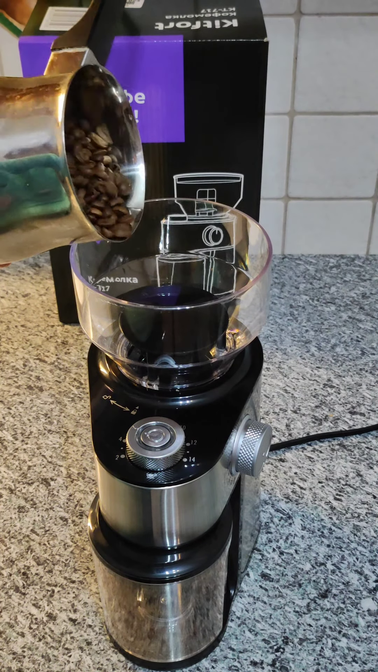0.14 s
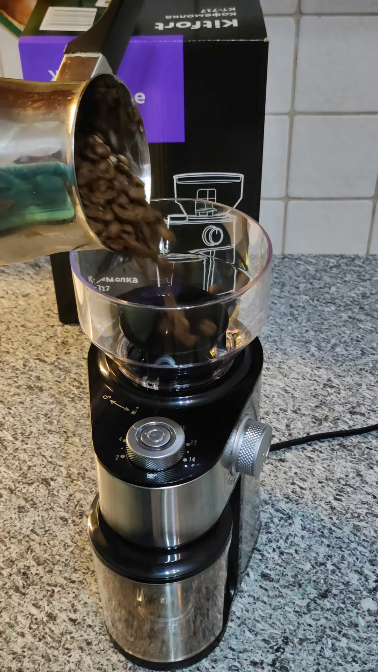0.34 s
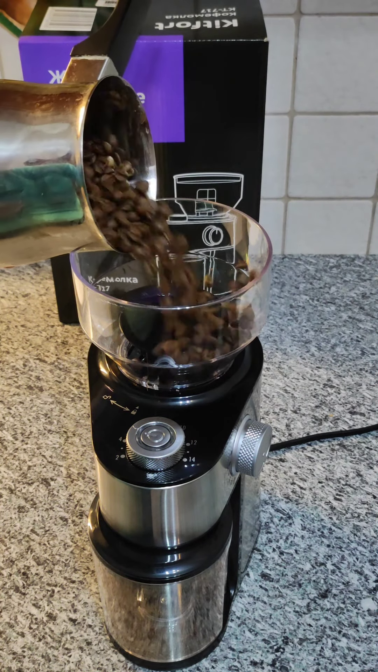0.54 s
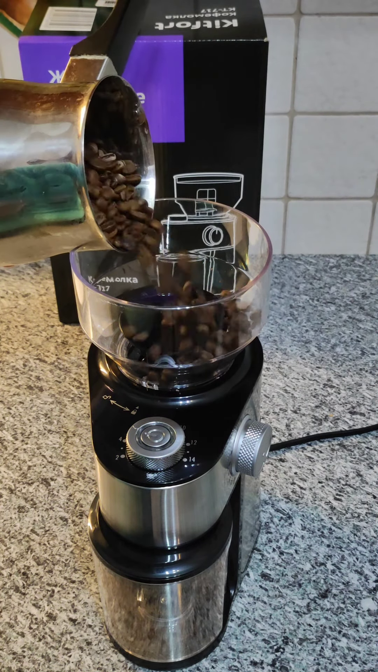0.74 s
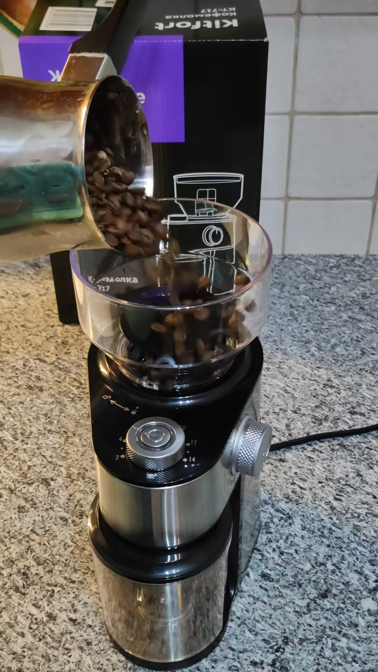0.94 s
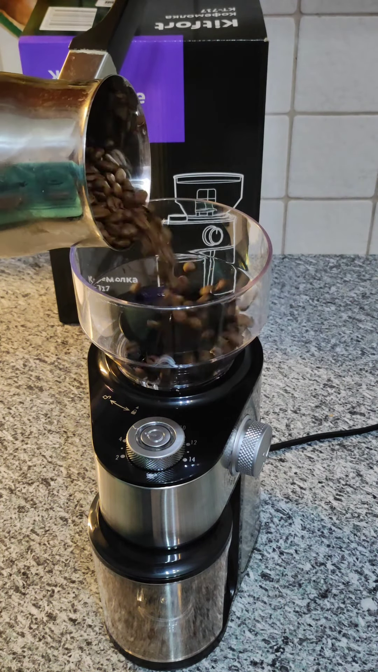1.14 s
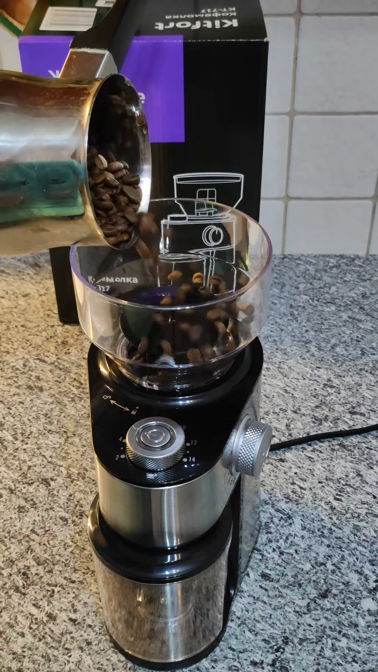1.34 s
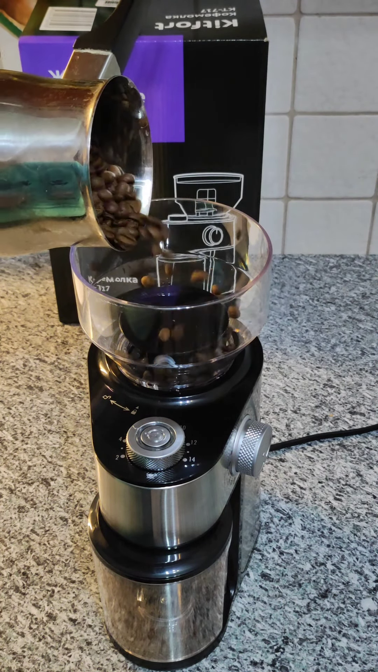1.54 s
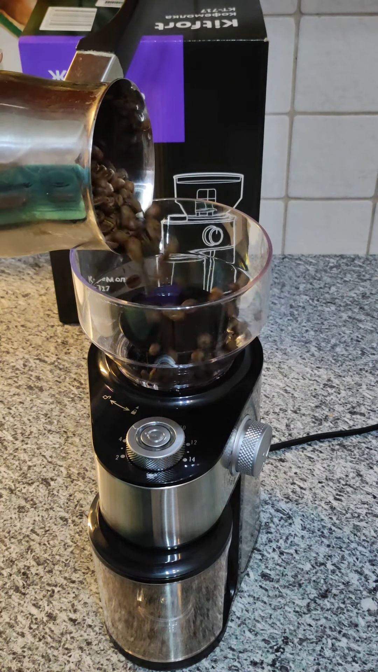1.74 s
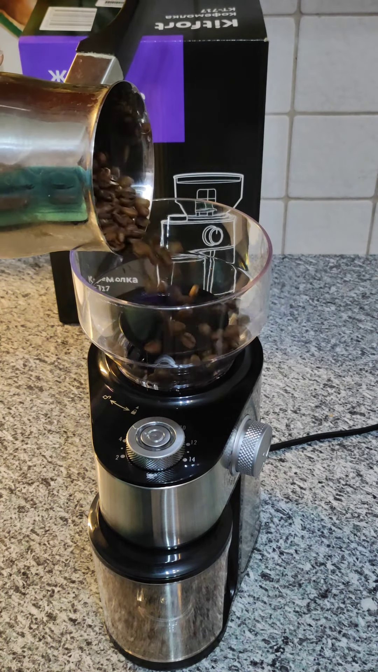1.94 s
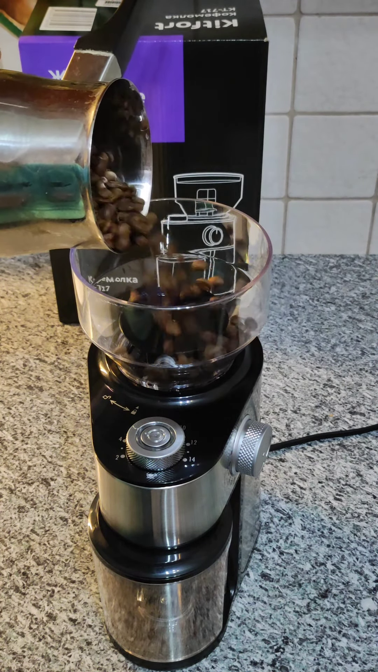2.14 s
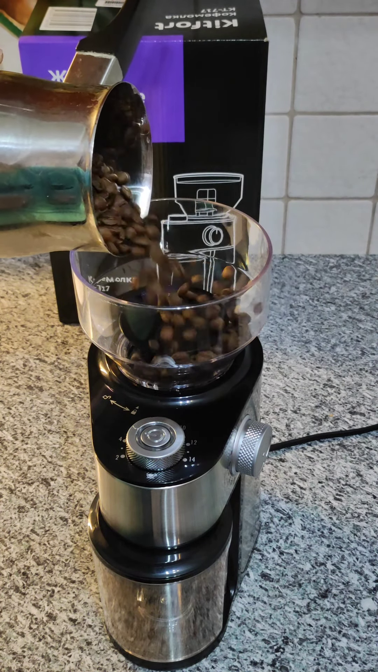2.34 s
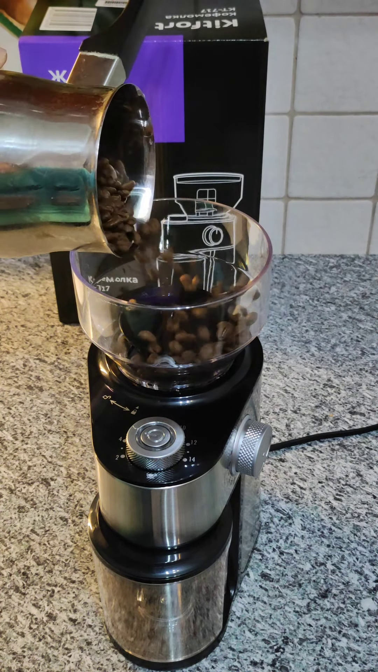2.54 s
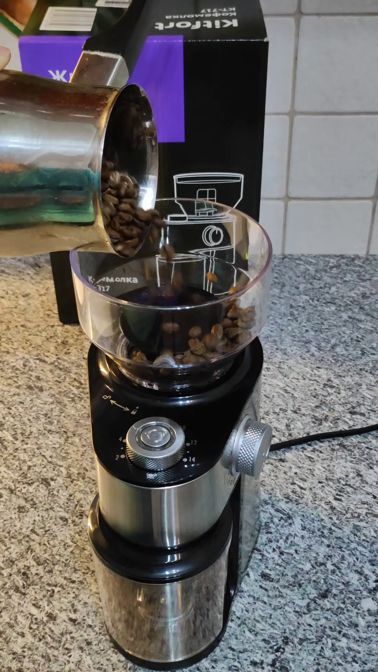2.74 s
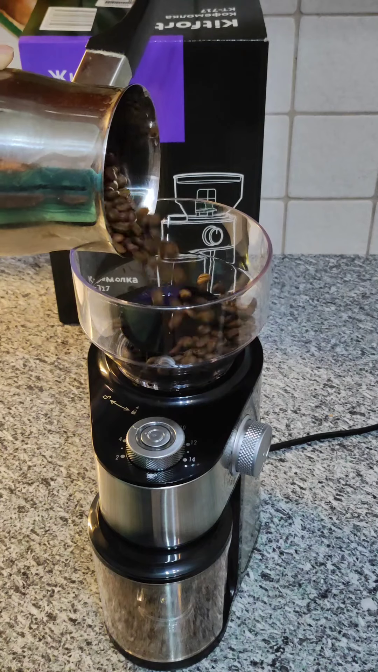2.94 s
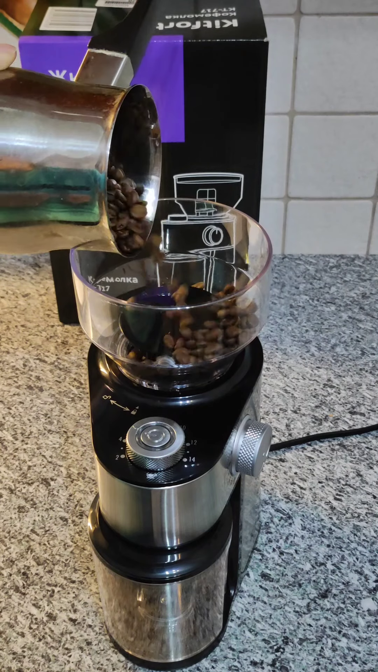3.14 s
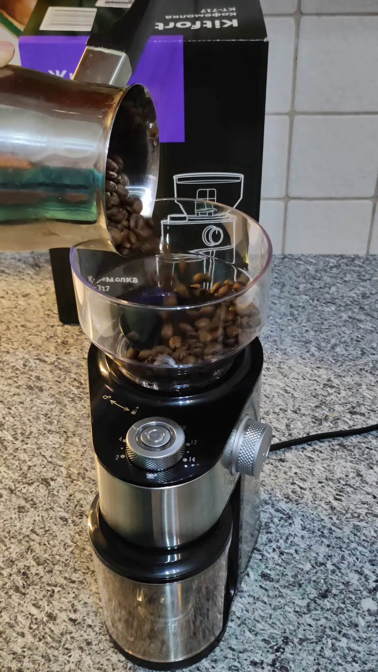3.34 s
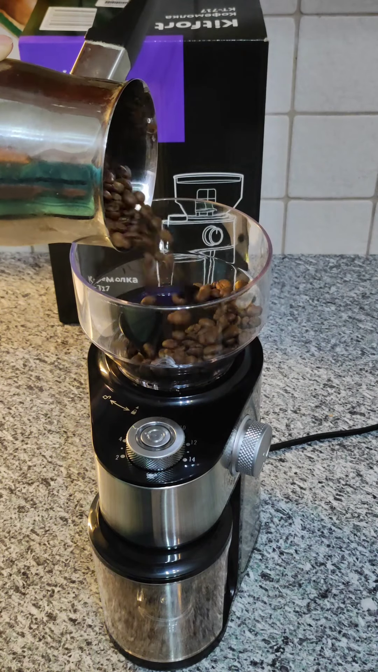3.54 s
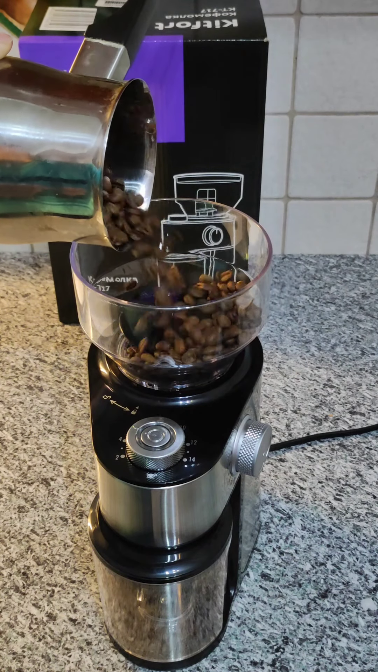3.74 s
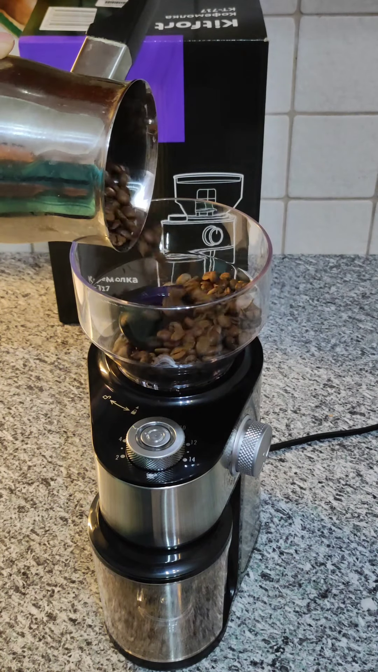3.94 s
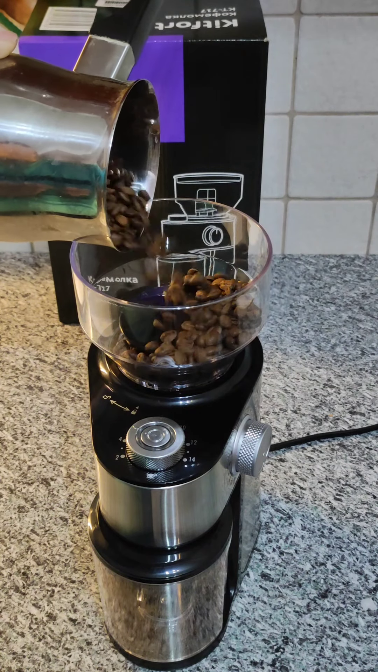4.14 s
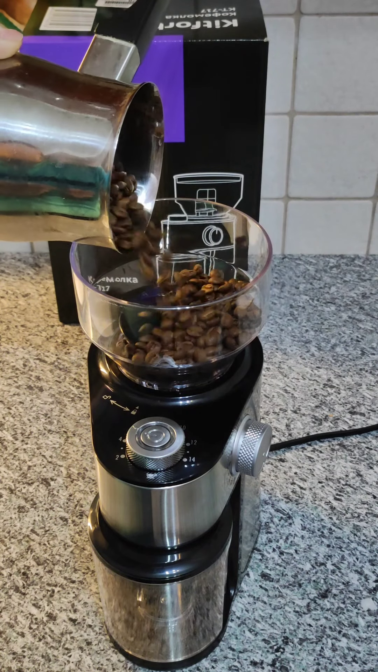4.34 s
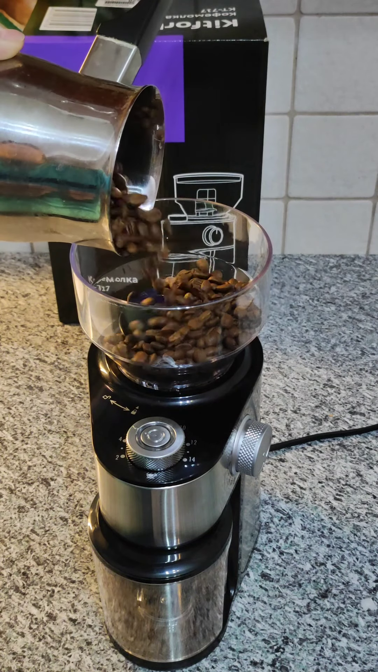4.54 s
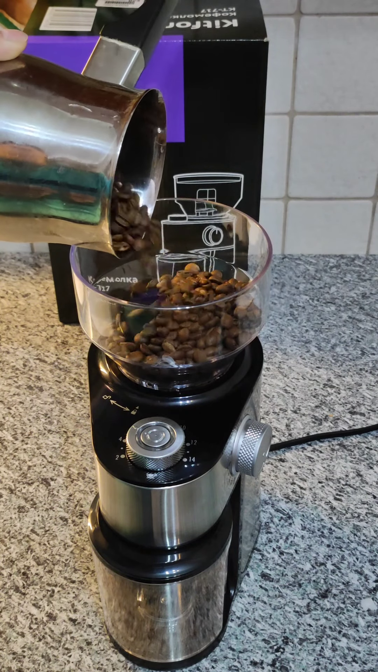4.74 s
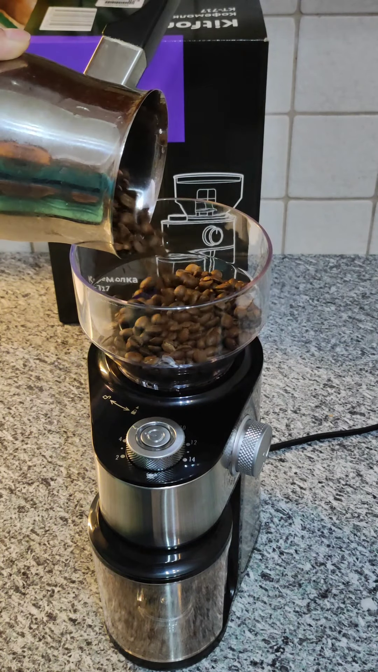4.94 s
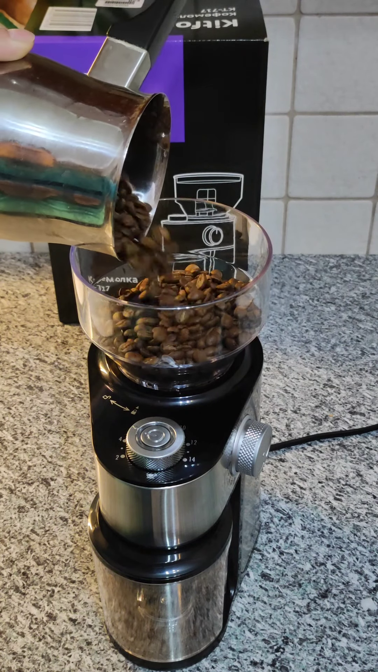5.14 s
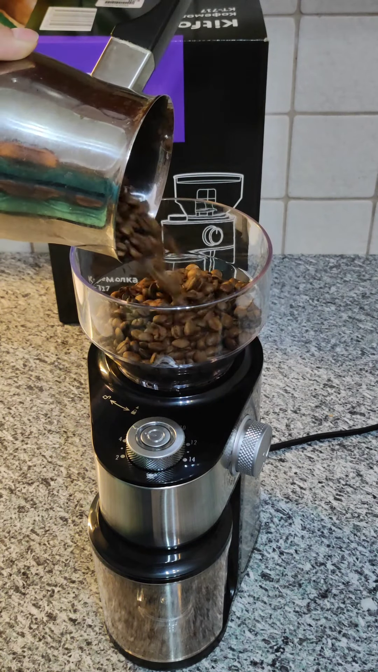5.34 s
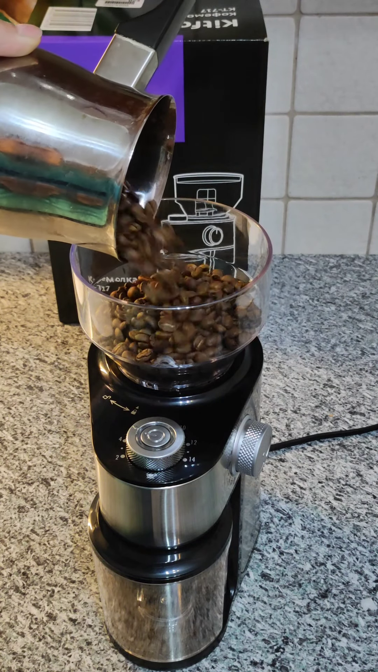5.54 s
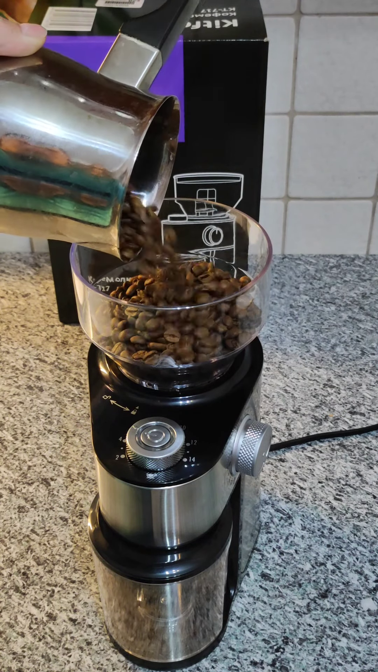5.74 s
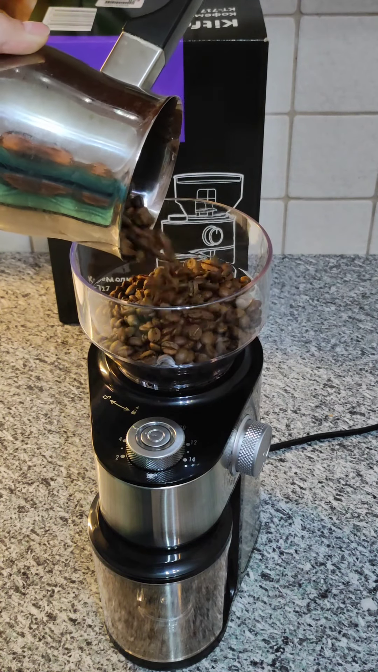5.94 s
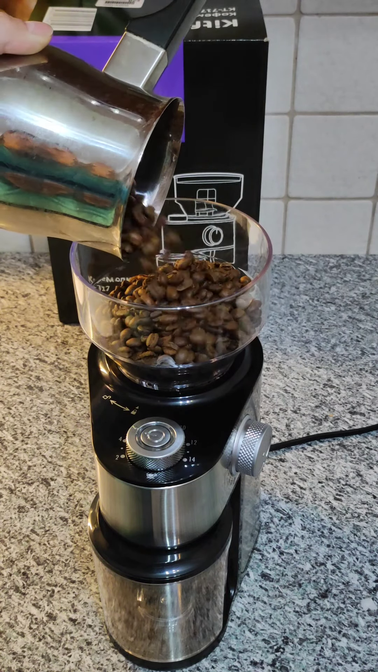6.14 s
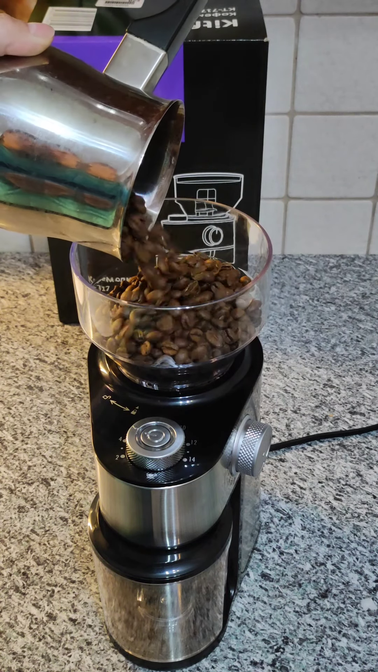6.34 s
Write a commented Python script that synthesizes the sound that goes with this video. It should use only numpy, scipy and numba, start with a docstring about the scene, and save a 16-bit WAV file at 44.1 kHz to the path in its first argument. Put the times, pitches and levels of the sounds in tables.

```python
"""Tiled kitchen: coffee beans pour from a metal jug into the plastic hopper of a grinder on a stone counter.
Each hit is a tick, a short noise tumble and a set of wall resonances; the grinder body knocks below.
The bean-on-bean share of the colour is small at first, fades by 2.5 s, then grows to the end.
A far-off fridge hums as steady sines over a low rumble, and tiles and counter add a dense noise tail.
A phone with two microphone ports and gain control listens from arm's length."""
import sys
import numpy as np
from scipy import signal
from scipy.fft import rfft, irfft
from scipy.io import wavfile
from scipy.ndimage import uniform_filter1d
from numba import njit

SR = 44100
rng = np.random.default_rng(int(sys.argv[2]) if len(sys.argv) > 2 else 0)


def wav_record(signal):
    """Record a signal, one row per channel, as 16-bit PCM in the file named by sys.argv[1]."""
    frames = np.transpose(np.atleast_2d(signal))
    bounded = np.clip(frames, -1, 1)
    # unit amplitude maps onto the largest positive 16-bit level
    quanta = np.round(bounded * 32767).astype(np.int16)
    wavfile.write(sys.argv[1], SR, quanta)


N = 286650
T = np.arange(N) / SR

# Fridge hum tones: pitch_hz, level_db (rms before the slight pan)
HUM = [(50, -54.5), (100, -64), (120, -73), (150, -80), (250, -68.5), (300, -69)]
# Colour of the kitchen rumble: pitch_hz, relative density_db
KITCHEN_COLOUR = [(15, -58), (25, 7.5), (72, -3.5), (174, -3.5), (681, -8), (884, -15), (1270, -27),
                  (2130, -30), (2560, -57), (3000, -57), (3900, -53), (6600, -120)]
RUMBLE_DB = -56.5

# Drive of the pouring stream: start_s, level_db
POUR = [(0, -47.5), (.42, -47.5), (.45, -19), (.59, -20.5), (.74, -18), (.79, -19.5), (.98, -20),
        (1.59, -21.5), (1.65, -24.5), (2.4, -22), (2.78, -28), (3.27, -30), (3.81, -30.5), (3.87, -25.5),
        (3.92, -29.5), (4.25, -31), (5.13, -33), (6.2, -41.5), (6.5, -41.5)]
# Brief dips (negative) and surges (positive) of the level: centre_s, change_db, half_length_s
LEVEL_CHANGES = [(0.068, -40, 0.069), (0.49, -7, 0.07), (2.044, -6, 0.023), (2.19, -2.5, 0.089),
                 (2.814, -4.5, 0.06), (3.108, 4, 0.065), (3.289, -16, 0.022), (3.344, -3.5, 0.021),
                 (4.2, -4, 0.066), (4.484, 3.5, 0.071), (4.533, -3, 0.031)]
# Where the stream lands: start_s, left_minus_right_db, wall_ring_db
AIM = [(0, -2.5, -23), (.35, -0.5, -3.5), (.55, -5.5, 0), (2.1, -5.5, 1), (3.2, -3, 6), (4.2, -3.5, 4.5),
       (5.2, 0, 5), (6, -0.5, -1.5), (6.5, -0.5, -5)]
# Share of hits coloured as beans landing on beans: start_s, share (0 to 1)
HEAP = [(0, 0.25), (2.5, 0.012), (4.5, 0.42), (6, 1), (6.5, 1.)]
FULL_S = 6.5  # the hopper fills evenly until then
HITS_PER_S, SIZE_SPREAD_DB = 1000., 2.0  # fullest hit rate, decay scale of the spread of hit sizes
THIN_DB, THIN_SLOPE = -28, .35  # under this flow the hits come further apart

# Single hits and bounces of beans: start_s, strike_db, low_wall_ring_db, treble_tilt_db (before the mix)
BEANS = [(0.0221, -32.5, -22, 5), (0.0798, -16.5, -10, 8.5), (0.0838, -15.5, -8, 1),
         (0.1849, -10.5, -38, -1), (0.251, -20, -30, 0), (0.314, -30, -21, 6.0), (0.3728, -7, -8, 5),
         (0.378, -11, -3, 3), (0.4335, -7, 2, -1), (0.4519, -6.5, -17, 3.0), (0.4707, -11.5, -23, -17),
         (0.546, -5, -16.0, 0.0), (1.034, -12, -6, 12), (1.0495, -17, -11, -10), (1.141, -19, -9, 6),
         (1.156, -3, -2, 0), (1.225, -26, -7, 0), (1.2962, -6, 3, -10), (1.6259, -25, -6.5, 1.0),
         (1.6855, -18, -10, 12), (1.713, -11, 2, 0.0), (1.763, -8.5, 2, -2), (1.7875, -22, -1, -1),
         (2.1998, -16, -13, 3), (2.479, -8, -11, -8), (2.845, -14, -1, 7), (2.862, -16.5, 6, 12),
         (2.9126, -15, -22, 9), (2.934, -15, -5, 11), (2.9464, -18, 8, 6), (3.103, -10, 9, 3),
         (3.189, -6, -9, 2), (3.2167, -20, -12, 0), (3.2256, -9, -10, 5), (3.2728, -12, -10, -5),
         (3.3058, -18, -2.0, 2.0), (3.318, -11, 1, 1), (3.376, -10.5, 3, -5), (3.351, -13.5, 4, -4),
         (3.366, -12, 5, 0), (3.4263, -12, -10, 6), (3.5677, -24, -10, 16), (3.615, -13, -13, 10),
         (3.6305, -18.0, 2, 2), (3.7289, -13, 3, 5), (3.7568, -12, 4, 12), (3.8552, -3.5, -5, 3),
         (3.9351, -14, -10, 1), (3.9752, -15, 3, 14), (4.1018, -5, -4, -1), (4.1622, -18, -14, 12),
         (4.1956, -19, -13, 6.0), (4.2175, -10, -2, -2), (4.285, -17.5, -5, 12), (4.352, -13.5, -8, 3),
         (4.405, -16, -24, 17), (4.4387, -19, -12, 5), (4.4977, -6, -1.5, 5), (4.571, -12, -16, 6),
         (4.659, -24, -9, 6), (4.719, -14, -12.0, 4), (4.7577, -27, -12.0, 2), (4.7902, -15, -12, 4),
         (4.868, -22, -9.5, 5), (4.9366, -11, -17, 2), (4.974, -23.5, -11.0, 3.5), (5.0977, -18, -17, -9),
         (5.1369, -23, -13.0, -7), (5.199, -11, -6, -4), (5.299, -23.5, -9.5, -0.5), (5.483, -17, -10.0, 1),
         (5.5617, -32, -18, 8), (5.6163, -21, -2, 2.5), (5.654, -20, -2, 10), (5.6875, -17.5, -10, -1),
         (5.721, -29, -14.0, 4), (5.7736, -21, -11, 3.0), (5.846, -16.5, -21, 4), (5.955, -28, -5, 3),
         (5.971, -23, -16.0, 7), (6.0052, -38, -20, -0.5), (6.0197, -31, -22, 5), (6.0416, -21, -11, 6.0),
         (6.0993, -27, -18.0, 8), (6.152, -34.5, -10, 10.0), (6.2592, -26.5, -7, 11),
         (6.316, -27, -22.0, 10.0), (6.3322, -27.5, -22, 8), (6.3563, -21.5, -17.0, 1),
         (6.3973, -26, -28, 8.0), (6.4351, -17, -30, 9), (6.458, -17, -25, 3), (6.487, -20.5, -5, 10)]
TUMBLE_S, BEAN_TICK_DB = 0.013, 9  # t60 of the tumble on bare wall, tick boost
BEAN_BASS_DB = -6  # a single hit barely moves the lowest wall modes

# Hopper wall modes: pitch_hz, width_hz (wall free of beans), level_db, full_pitch_change_percent, full_level_change_db
HOPPER = [(392, 26, -13, 0, 3), (538, 10, -11, 0, -3), (596, 30, -3, 1, -2), (1083, 11, -3.5, -6, -10),
          (1334, 21, 4.5, -4, 1), (3246, 24, 6.5, 1.8, -5), (3818, 24, -2.5, -2, -10),
          (4030, 45, -4, -3, -8), (639, 25, -16, 0, 0), (864, 24, -20, 0, 0), (1484, 54, -5, 1, 1),
          (2460, 79, -12, 0, -12), (3330, 120, -4, 2.5, -4), (4915, 130, 4.5, 3, -1),
          (6960, 85, 4, 1, -3.5), (8120, 150, 1, -2.5, 4), (8650, 117, 4, 0, -4), (10100, 90, -3, 0, -4),
          (11800, 120, 8, 0, -3.5), (13800, 160, 4, 0, -3.5)]
# Edges between bass, low, middle and high wall modes: pitch_hz
MODE_GROUPS_HZ = [1200, 2000, 4500]
# Wall ring under the patter for the bass, low, middle and high modes: level_db
RING_DB = [-5.5, -5, -1, -4.5]
# Colour of a bean cracking on plastic: pitch_hz, relative density_db
ON_WALL = [(150, -61), (250, -66), (458, -106), (580, -11.5), (962, -78), (1350, -2.5), (1890, -20.5),
           (3230, 0.5), (3640, -5), (4930, 3), (5830, 2.5), (14000, 4)]
# Colour of a bean cracking on beans: pitch_hz, relative density_db
ON_HEAP = [(880, -56), (1500, -32), (1890, -12.5), (2530, -17), (3480, -24), (4480, -24), (4920, 2.5),
           (7080, -12), (7700, -1.5), (8220, -3.5), (10200, -6.5), (13000, 2), (14000, -2)]
# Bands of the tumble, each with its own tint: low_hz, high_hz
CRACK_BANDS = [(200, 2500), (2500, 4200), (4200, 6500), (6500, 9500), (9500, 12000), (12000, 16000)]
# Stereo width of the beans: pitch_hz, side_minus_mid_db
WIDTH = [(60, -8), (110, -3), (200, -6), (380, -21), (700, -21), (1290, 0), (2380, -5), (4400, 1),
         (6000, -7), (8120, -8.5), (15000, -11.5)]

THUD_S, THUD_DB = 0.551, -38.5  # the grinder body rocks under the first rush
KNOCKS_PER_S, KNOCK_DB = 40., -33  # faint jolts of the body, push relative to the flow

ROOM_T60_S, ROOM_DB = 0.29, 0.5
EARLY_T60_S, EARLY_DB = 0.025, 5  # echoes of counter and box, above the tail

# Colour difference of the microphone ports: pitch_hz, left_minus_right_db
PORTS = [(60, 0), (200, -0.5), (700, 0.5), (1290, 3.5), (2400, 0.5), (8000, 2.5), (13000, 4.5)]
# Phase by which the left port leads: pitch_hz, lead_rad
PORT_LEAD = [(2000, 0), (2700, 1.8), (4400, 1.9), (5800, 2.9), (6400, 6.28)]
TOP_HZ = 14200  # the treble is cut above this


def undb(db):
    """Turn decibels into an amplitude factor."""
    return 10 ** (np.asarray(db) / 20)


def unit(x):
    """Scale to rms 1."""
    return x / np.sqrt(np.mean(x ** 2))


def at_hz(table, hz):
    """Read a table of pitch_hz and value on a log-frequency axis."""
    f, v = np.transpose(table)
    return np.interp(np.log(np.maximum(hz, 1)), np.log(np.maximum(f, 1)), v)


def curve(table):
    """Draw the columns of a time table, sample by sample."""
    s, *columns = np.transpose(table)
    return [np.interp(T, s, column) for column in columns]


def band_pass(x, edges_hz):
    """Keep what lies between two frequencies, with gentle slopes."""
    return signal.sosfilt(signal.butter(2, edges_hz, "band", fs=SR, output="sos"), x)


def noise(colour, width):
    """Left and right noise of a given colour, built from unrelated mid and side."""
    hz = np.arange(N // 2 + 1) * SR / N
    mid, side = rfft(rng.standard_normal((2, N))) * undb(at_hz(colour, hz))
    side = side * undb(at_hz(width, hz))
    return unit(irfft(np.array([mid + side, mid - side]), N))


def kitchen():
    """Fridge hum as steady sines over a low noise rumble, each leaning slightly to one side."""
    hum = sum(np.sqrt(2) * undb(db) * np.sin(2 * np.pi * (hz * T + rng.random())) for hz, db in HUM)
    width = [(40, -10), (120, -13.0), (300, -15), (2000, 15.0)]  # pitch_hz, side_minus_mid_db
    rumble = undb(RUMBLE_DB) * noise(KITCHEN_COLOUR, width)
    return hum * undb([[-.4], [.4]]) + rumble * undb([[-1.5], [1.5]])


def room(x, count=9):
    """Tiles and counter return a dense tail; hits at different spots get different echoes."""
    t = np.arange(SR // 4) / SR
    own = rng.standard_normal((count, 2, len(t)))
    shared = rng.standard_normal((count, 1, len(t)))
    fade = 1000. ** (-t / ROOM_T60_S) + undb(EARLY_DB) * 1000. ** (-t / EARLY_T60_S)
    onset = np.clip(t / 0.0013, 0, 1)
    tails = (own + 2.33 * shared) * fade * onset
    tails = signal.sosfilt(signal.butter(1, 9000, fs=SR, output="sos"), tails)
    tails /= np.sqrt(np.sum(tails ** 2, axis=2, keepdims=True))

    # a new random spot every 512 samples, with short crossfades
    spot = np.repeat(rng.integers(0, count, N // 512 + 1), 512)[:N]
    wet = 0
    for k in range(count):
        share = uniform_filter1d(1. * (spot == k), size=256)
        wet = wet + signal.oaconvolve(x * share, tails[k], axes=1)
    return undb(ROOM_DB) * wet[:, :N]


def flow():
    """Drive level of the patter in dB, with its brief dips and surges."""
    level_db = curve(POUR)[0]
    for s, change_db, half_s in LEVEL_CHANGES:
        level_db = level_db + change_db * np.clip(1 - np.abs(T - s) / half_s, 0, 1)
    return level_db


def heap():
    """Share of hits coloured as beans on beans, sample by sample."""
    return np.clip(curve(HEAP)[0], 0, 1)


@njit
def mode(push, hz, width):
    """A ringing mode whose pitch and damping may drift: a decaying rotation fed by the push."""
    out, left, right, pole = np.empty(push.shape), 0j, 0j, 0j
    for i in range(push.shape[1]):
        if i % 64 == 0:
            pole = np.exp(np.pi * (2j * hz[i] - width[i]) / SR)
        left = left * pole + push[0, i] + 1e-18
        right = right * pole + push[1, i] + 1e-18
        out[0, i], out[1, i] = left.imag, right.imag
    return out


def thud():
    """Low body modes of the grinder on the counter, pushed by one strong knock and many faint ones."""
    push = (rng.random(N) < KNOCKS_PER_S / SR) * rng.standard_normal((2, N)) * undb(flow() + KNOCK_DB)
    push[:, int(THUD_S * SR)] = undb(THUD_DB + np.array([-3., 3.]))
    soft = band_pass(push, [80, 320])
    body = [(111.0, 35.0, 5), (150.0, 12.0, -0.5), (228.0, 16.0, 3.5)]  # pitch_hz, width_hz, level_db
    return sum(undb(db) * mode(soft, np.full(N, hz), np.full(N, width)) for hz, width, db in body)


def ring(at, size, group_db, spread_db):
    """Every hit strikes a new spot, so it feeds each wall mode with its own sign and strength."""
    out, fill = np.zeros((2, N)), T / FULL_S
    damping = 1 + heap()  # beans leaning on the wall choke its ring
    for hz, width, db, pitch_percent, full_db in HOPPER:
        spot, side, scatter = rng.standard_normal((len(at), 3)).T
        aim_db = group_db[np.searchsorted(MODE_GROUPS_HZ, hz)]
        strength_db = db + spread_db * scatter + aim_db + full_db * fill[at]
        mid = np.sign(spot) * size * undb(strength_db)
        push = np.zeros((2, N))
        push[:, at] = mid * (1 + side * undb(at_hz(WIDTH, hz)) * np.array([[1], [-1]]))
        pitch_hz = hz * (1 + pitch_percent / 100 * fill ** 2)
        out += mode(push, pitch_hz, width * damping) * width / 300
    # keep only the ring above 340 Hz
    return signal.sosfilt(signal.butter(8, 340, "high", fs=SR, output="sos"), out)


@njit
def rattle(power, keep, rise):
    """Amplitude envelope of overlapping hits; each rises briefly and dies away."""
    out, fall, soft = np.empty(len(power)), 0., 0.
    for i in range(len(power)):
        fall = fall * keep[i] + power[i] + 1e-30
        soft += rise * (fall - soft)
        out[i] = np.sqrt(soft)
    return out


def crack(at, size, t60, tick_db, tint_db, tilt_db):
    """A bean's sharp tick and quick noise tumble, its colour mixed from plastic and beans by the heap share."""
    share = heap()
    colour = np.sqrt(1 - share) * noise(ON_WALL, WIDTH) + np.sqrt(share) * noise(ON_HEAP, WIDTH)
    sign, *tints = rng.standard_normal((len(at), 1 + len(CRACK_BANDS))).T
    out = 0
    # half the tilt is taken from the lower band, half given to the upper
    for edges_hz, lean in [([3200, 7500], -.5), ([7500, 14000], .5)]:
        tick = np.zeros((2, N))
        tick[:, at] = np.sign(sign) * size * undb(tick_db + lean * tilt_db)
        out = out + band_pass(tick, edges_hz)

    keep = 1e-6 ** (1 / (t60 * (1 - 0.54 * share) * SR))  # a bean stops sooner among beans
    spectrum, hz = rfft(colour), np.arange(N // 2 + 1) * SR / N
    for (low_hz, high_hz), tint in zip(CRACK_BANDS, tints):
        lean = .5 if low_hz > 6000 else -.5
        power = np.zeros(N)
        np.add.at(power, at, (size * undb(tint_db * tint + lean * tilt_db)) ** 2)
        band = irfft(spectrum * ((hz >= low_hz) & (hz < high_hz)), N)
        out += rattle(power, keep, 0.14) * band
    return out


def beans():
    """Single hits and bounces over the patter, each with its own low wall ring and treble tilt."""
    s, strike_db, low_db, tilt_db = np.transpose(BEANS)
    at, size = (s * SR).astype(int), undb(strike_db)
    burst = crack(at, size, TUMBLE_S, BEAN_TICK_DB, tint_db=-1.0, tilt_db=tilt_db)
    group_db = [low_db + BEAN_BASS_DB, low_db, -4., -6.]
    return undb(-6.0) * burst + undb(-11.5) * ring(at, size, group_db, spread_db=1.5)


def stream():
    """The dense patter: random hits, many small and a few large, crack and ring the wall."""
    level_db, chance = flow(), rng.random((N, 2))
    thin_db = np.clip(THIN_SLOPE * (level_db - THIN_DB), -3.5, 0)
    at = np.flatnonzero(chance[:, 0] < undb(thin_db) * HITS_PER_S / SR)
    # sparser hits are made larger in return
    size = undb((level_db - thin_db / 2)[at] - SIZE_SPREAD_DB * np.log(1 - chance[at, 1]))
    patter = crack(at, size, 0.03, tick_db=14.5, tint_db=3.0, tilt_db=-1.0)
    wall_db = curve(AIM)[1][at]
    group_db = [wall_db + ring_db for ring_db in RING_DB]
    return undb(-5.5) * patter + undb(-8.5) * ring(at, size, group_db, spread_db=1.5)


def scene():
    """The beans, panned to where the stream lands, with their room tail, the thuds and the kitchen."""
    pan_db = curve(AIM)[0]
    near = (stream() + beans()) * undb(np.array([pan_db, -pan_db]) / 2)
    return near + room(near) + thud() + kitchen()


def record(dry):
    """Two ports differ in colour and phase; gain control turns loud sound down;
    the band around 210 Hz thins out whenever the sound is loud."""
    hz = np.arange(N // 2 + 1) * SR / N
    tilt_db = at_hz(PORTS, hz)
    spectrum = rfft(dry) * undb(np.array([tilt_db, -tilt_db]) / 2)
    spectrum[0] *= np.exp(1j * at_hz(PORT_LEAD, hz))
    ports = irfft(spectrum, N)
    low_mid_band = np.exp(-(np.log((hz + 1) / 210) / 0.35) ** 4)  # around 210 Hz
    low_mid = irfft(spectrum * low_mid_band, N)

    # both follow the full-band level: one over 0.15 s, one over 10 ms
    power = np.mean(ports ** 2, axis=0)
    keep = np.exp(-1 / (.15 * SR))
    loud = np.sqrt(signal.lfilter([1 - keep], [1, -keep], power))
    quick = np.sqrt(uniform_filter1d(power, int(0.01 * SR)) + 1e-18)
    gain = np.maximum(loud / undb(-30.0), 1) ** -.3
    low_mid_share = np.maximum(quick / undb(-21.5), 1) ** -4.
    out = (ports + (low_mid_share - 1) * low_mid) * gain
    return signal.sosfilt(signal.ellip(12, .2, 90, TOP_HZ, fs=SR, output="sos"), out)


dry = scene()
out = record(dry)
wav_record(out)
```